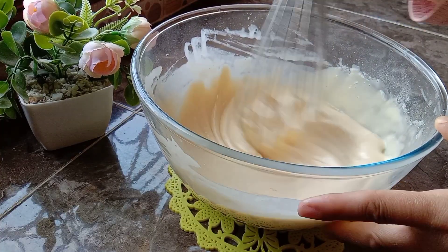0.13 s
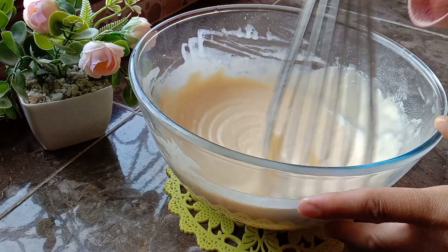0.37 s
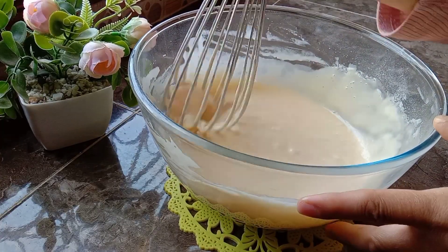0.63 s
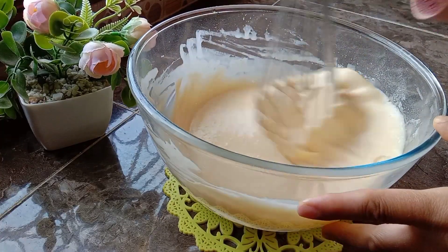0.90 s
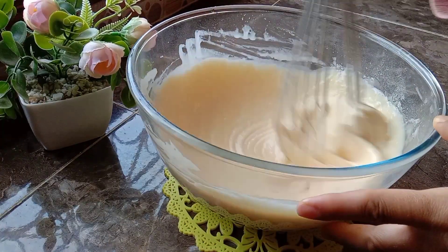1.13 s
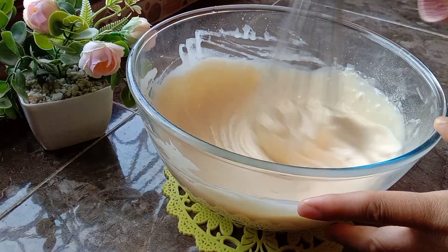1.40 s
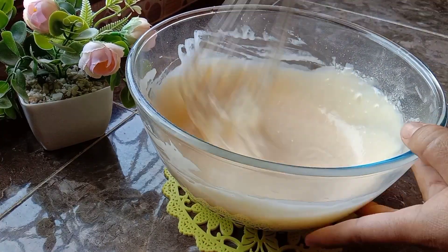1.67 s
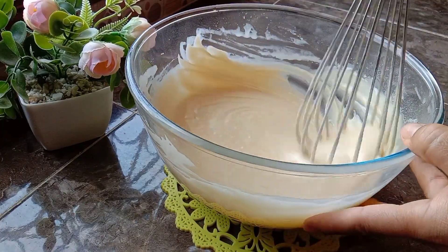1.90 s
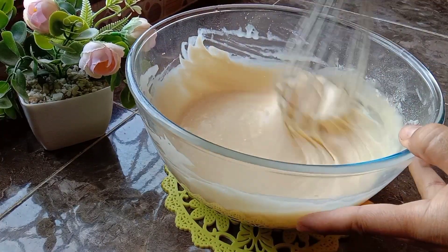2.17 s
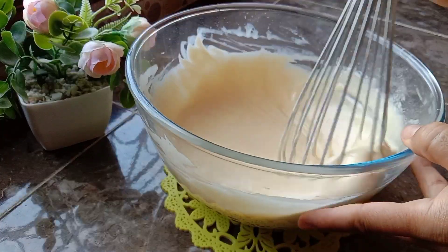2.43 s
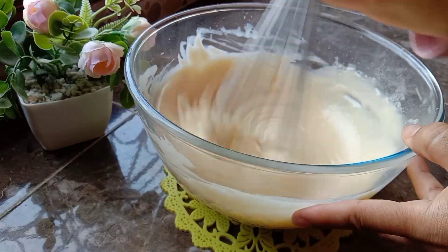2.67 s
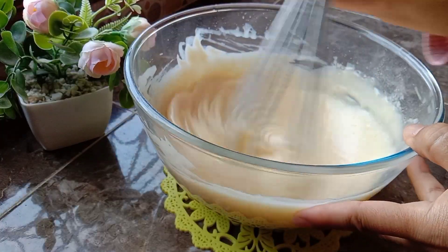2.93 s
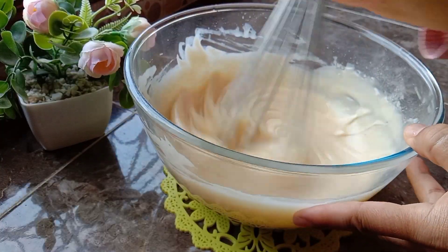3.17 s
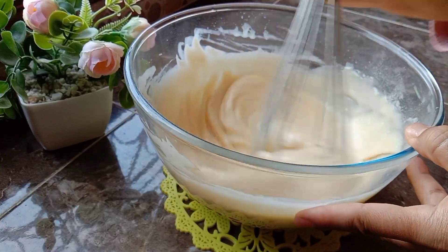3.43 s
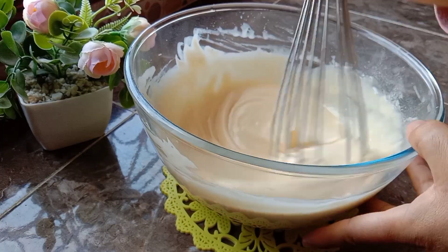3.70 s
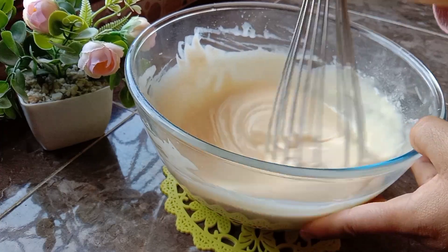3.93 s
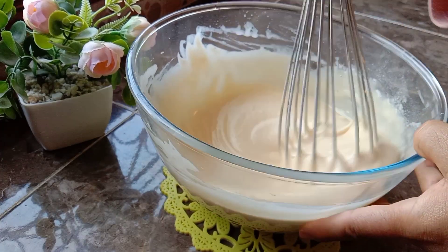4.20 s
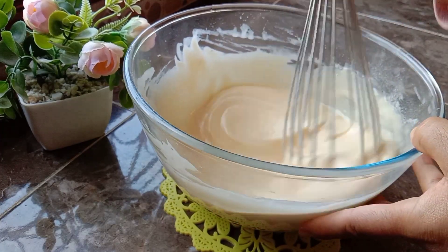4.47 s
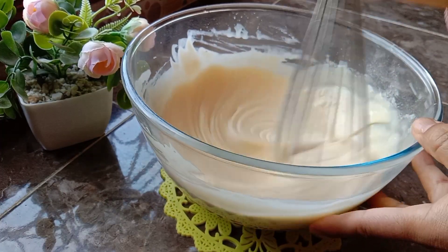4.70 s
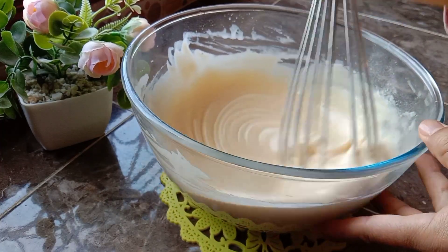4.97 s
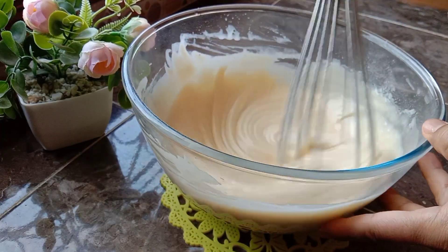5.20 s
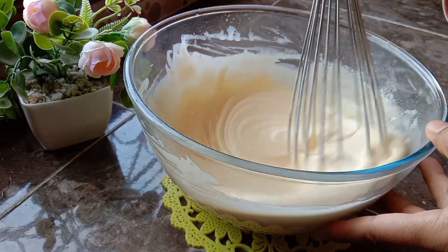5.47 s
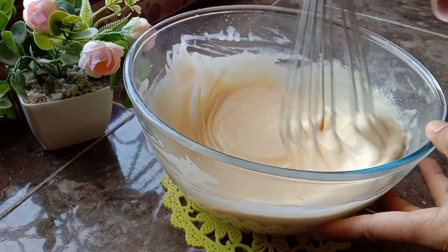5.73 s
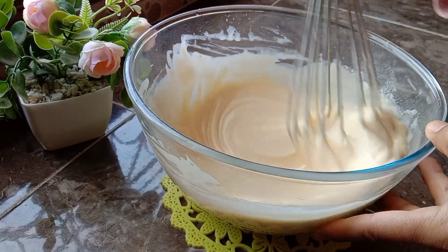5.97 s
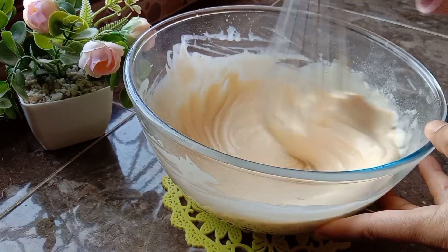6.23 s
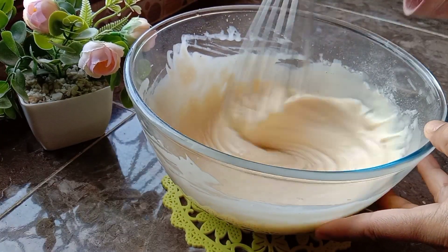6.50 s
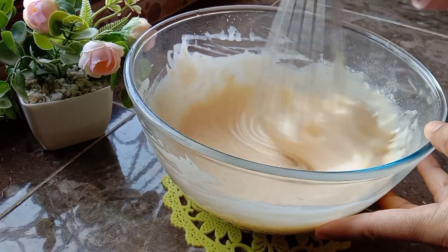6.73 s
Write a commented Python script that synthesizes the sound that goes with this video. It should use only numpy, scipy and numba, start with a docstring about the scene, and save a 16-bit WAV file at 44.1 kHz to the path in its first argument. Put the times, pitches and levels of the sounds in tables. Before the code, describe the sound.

A wire whisk beats thin batter in a glass bowl, heard closely in a hard kitchen. From 0 to 1 seconds the clicks are sparse and moderate, with short scrapes and low murmurs of the bowl on its mat. A strong dull knock lands at 1.2, another at 1.6, then at 1.87 the loudest stroke: a bright double clank with a brief glassy ring and a hissy scrape. From 2 to 3.4 it is softer, with small ticks and gentle drags. From 3.5 strokes come about four per second, each a cluster of damped clatter over a low shudder, heavier around 4.0 to 4.3. Firm knocks hit at 5.34 and 5.75, with a deep counter thump near 5.6. From 6 to 7 the beating is densest and brightest, wires rattling rapidly over rumble. A faint hush and a barely audible thin whine lie beneath.

```python
"""A wire whisk beats thin batter in a glass bowl on a mat, close to a phone in a hard-walled kitchen.
Wire blows are noise bursts through resonances of the batter-damped bottom, or impulses into free rim modes.
Drags scrape: uneven noise through the same bottom. Shoves rumble: noise through mat, bowl and counter resonances.
Blows and rim get a short diffuse tail; a faint hush and whine lie below, turned down by the phone."""
import sys
import numpy as np
from scipy import signal
from scipy.fft import rfft, irfft
from scipy.io import wavfile
from scipy.ndimage import uniform_filter1d
from numba import njit

SR = 44100
rng = np.random.default_rng(int(sys.argv[2]) if len(sys.argv) > 2 else 0)


def int16_out(signal):
    """Quantize to a 16-bit WAV file."""
    q = np.round(np.clip(np.atleast_2d(signal).T, -1, 1) * 32767)
    wavfile.write(sys.argv[1], SR, q.astype(np.int16))


def volts(x):
    """Linear amplitude factor 10**(x/20) for a level x in dB, scalar or array-like."""
    e = np.asarray(x, float) / 20
    return 10 ** e


N = 302967
T = np.arange(N) / SR
STEP_T = T[::44]  # about 1 ms apart


def unit(x):
    """Scale to rms 1."""
    return x / np.sqrt(np.mean(x ** 2))


def ring(x, hz, t60_s):
    """One decaying mode; an impulse of 1 starts it at amplitude 1."""
    pole = np.exp(2j * np.pi * hz / SR - np.log(1000) / (t60_s * SR))
    return signal.lfilter([1], [1, -pole], x).imag


def resonate(x, modes):
    """Sum of resonances given as (pitch_hz, width_hz, level_db)."""
    out = 0 * x
    for hz, width_hz, level_db in modes:
        b, a = signal.iirpeak(hz, hz / width_hz, fs=SR)
        out = out + volts(level_db) * signal.lfilter(b, a, x)
    return out


def band(x, lo_hz, hi_hz):
    """Gentle band-pass."""
    sos = signal.butter(2, [lo_hz, min(hi_hz, .45 * SR)], "band", fs=SR, output="sos")
    return signal.sosfilt(sos, x)


def walk(rate_hz):
    """Random levels of rms 1, held 1 / rate_hz and slewed twice."""
    k = int(SR / rate_hz)
    held = np.repeat(rng.standard_normal(N // k + 1), k)
    return unit(uniform_filter1d(uniform_filter1d(held, k), k)[:N])


@njit
def glide(x, hz, width_hz):
    """Band-pass whose centre moves: a state-variable filter retuned every sample."""
    y, band_state, low_state = np.empty(len(x)), 0., 0.
    for i in range(len(x)):
        g, k = np.tan(np.pi * hz[i] / SR), width_hz / hz[i]
        v = (band_state + g * (x[i] - low_state)) / (1 + g * (g + k))
        band_state = 2 * v - band_state
        low_state += 2 * g * v
        y[i] = k * v
    return y


# background noise spectrum: pitch_hz, relative_level_db
HUSH_SPECTRUM = [(24, -28), (40, -8), (237, 15.5), (715, -4), (1480, -4.5), (1630, -4), (1810, -23),
                 (2570, -3.5), (2840, -6), (16000, -32)]


def hush():
    """Steady background noise of the kitchen: white noise shaped by a spectrum over log frequency."""
    hz, db = np.transpose(HUSH_SPECTRUM)
    log_hz = np.log(np.fft.rfftfreq(N, 1 / SR) + 1)
    colour = volts(np.interp(log_hz, np.log(hz), db))
    return volts(-61.5) * unit(irfft(rfft(rng.standard_normal(N)) * colour, N))


def whine():
    """A faint thin wavering background tone: noise through one narrow resonance."""
    tone = unit(resonate(rng.standard_normal(N), [(5462, 30, 0)]))
    return volts(-85 + 1.5 * walk(6)) * tone


# glass bottom damped by batter: pitch_hz, width_hz, level_db
BOTTOM_MODES = [(1262.6, 82, -1), (1696, 94, -19.5), (2600, 55, -35.5), (3089, 220, 1.5), (3570, 43, -4.5),
                (3980, 200, -58.5), (5026, 770, -25.5), (5770, 89, -3), (6700, 230, 1), (7126, 94, -3.5),
                (8450, 140, -9.5), (9250, 140, -7), (11300, 760, -31.5), (15650, 3100, -15)]
# edges of the low, middle and high range: edge_hz
RANGE_EDGES_HZ = (0, 2100, 5100, SR / 2)


def bottom_modes(k):
    """The bottom's resonances in the low (0), middle (1) or high (2) range."""
    return [m for m in BOTTOM_MODES if RANGE_EDGES_HZ[k] <= m[0] < RANGE_EDGES_HZ[k + 1]]


def efforts(start_s, swell_s, db, fade_db_s):
    """Power of each effort, one row each: it swells to its strength, then fades steadily in dB."""
    since_s = STEP_T - start_s[:, None]
    swell = np.clip(since_s / swell_s[:, None], 0, 1) ** 0.8
    fade_db = fade_db_s * np.clip(since_s - swell_s[:, None], 0, None)
    return (swell * volts(db[:, None] - fade_db)) ** 2


def total_db(power, idle_db):
    """Level of all efforts together over the idle level, per sample."""
    return np.interp(T, STEP_T, 10 * np.log10(power.sum(axis=0) + volts(2 * idle_db)))


def scrape(db, treble_db):
    """Wires drag over the glass in tiny uneven slips that excite the damped bottom."""
    slips = rng.standard_normal(N) * volts(3 * walk(500) + walk(45))
    body = volts(-15.5) * unit(resonate(slips, bottom_modes(0) + bottom_modes(1)))
    body += volts(-2.5) * unit(band(slips, 810, 3900))
    top = volts(-4.5) * unit(resonate(slips, bottom_modes(2)))
    top += volts(-21.5) * unit(band(slips, 4600, 12000))
    return volts(db) * (body + volts(treble_db) * top)


# drags of the wires over the glass: start_s, swell_s, strength_db, treble_relative_db
DRAG_EVENTS = [(-.03, 0.026, -59.5, -7.5), (.066, .02, -51.5, -28.5), (.09, 0.088, -56.5, -14),
               (.364, .02, -54, -22), (.6, 0.12, -64, -10), (.86, .1, -57, -17), (1.15, 0.11, -51, -19),
               (1.375, 0.051, -57.5, -20), (1.6, 0.13, -60, -9.5), (1.87, 0.084, -41.5, -3),
               (2.05, 0.066, -54, -19.5), (2.46, 0.0324, -53.5, -11), (2.53, 0.11, -64.5, -20),
               (2.62, 0.091, -62.5, -18), (2.791, .09, -59, -15.5), (3.04, .1, -59.5, -12),
               (3.28, 0.021, -56, -14), (3.32, 0.055, -56, -19), (3.525, 0.014, -49, -5),
               (3.54, 0.055, -51, -16), (3.76, .02, -48, -8), (3.85, 0.14, -63, -18), (4.02, .02, -58, -10),
               (4.228, 0.042, -49, -7), (4.5, 0.025, -59, -1.5), (4.55, 0.049, -56.5, -25),
               (4.71, .13, -53.5, -10), (5.001, 0.087, -57.5, -10), (5.285, .02, -52.5, -23),
               (5.33, 0.014, -51, -14), (5.49, .03, -56, -16), (5.53, 0.052, -58, -8),
               (5.741, 0.076, -50, -0.5), (5.99, .03, -54, -7), (6.05, 0.012, -49.5, -2),
               (6.09, 0.014, -56, -13), (6.22, .025, -56.5, 1), (6.28, 0.043, -47.5, 0.5),
               (6.45, 0.039, -49.5, -5), (6.5, 0.064, -50, -5), (6.66, 0.044, -53.5, -15),
               (6.8, .07, -59, -16)]


def drags():
    """Scrape of the dragged wires, each drag with its own brightness, treble fading faster."""
    start_s, swell_s, db, treble_db = np.transpose(DRAG_EVENTS)
    # the whisk never quite rests: idle levels
    level_db = total_db(efforts(start_s, swell_s, db, fade_db_s=148.5), idle_db=-77.5)
    top_db = total_db(efforts(start_s, swell_s, db + treble_db, fade_db_s=191), idle_db=-90)
    return scrape(level_db, top_db - level_db)


# bowl on its mat: pitch_hz, width_hz, level_db
MAT_MODES = [(158, 60.5, 2), (207, 43, 2.5), (245, 51, -5), (325.7, 69, -4.5)]
# lowest modes of the bottom: pitch_hz, width_hz, level_db
HUM_MODES = [(584.2, 49, 22.5), (500, 51, 13), (780, 83, -33.5)]
# counter under the mat: pitch_hz, width_hz, level_db
COUNTER_MODES = [(88, 22, 1), (106, 31, 12.5)]


def rumble(db, hz, hum_db, thump_db):
    """The pushed bowl shudders on its mat at a moving pitch, its bottom hums and the counter thumps."""
    push = rng.standard_normal(N) * volts(0.78 * walk(30))
    moving = unit(glide(glide(push, hz, 70.), hz, 70.))
    fixed = unit(resonate(resonate(push, MAT_MODES), MAT_MODES))
    shudder = unit(moving + volts(-1) * fixed)
    hum = unit(band(resonate(push * volts(3.2 * walk(60)), HUM_MODES), 460, 900))
    thump = unit(resonate(resonate(push, COUNTER_MODES), COUNTER_MODES))
    return volts(db) * shudder + volts(hum_db) * hum + volts(thump_db) * thump


# the whisk shoves the bowl: start_s, swell_s, strength_db, shudder_pitch_hz, hum_relative_db
SHOVE_EVENTS = [(-.03, .03, -61.5, 245, 7), (.064, .025, -45, 195, -3.5), (.09, 0.086, -43.5, 207, -7),
                (.36, .025, -51, 185, -1.5), (.89, .08, -58, 192, 5.5), (1.12, .09, -50.5, 260, 4.5),
                (1.21, 0.038, -43.5, 235, -10), (1.375, .04, -52, 262, 0.5), (1.595, 0.023, -46, 215, -11),
                (1.69, 0.02, -55.5, 237, 7.5), (1.865, .02, -48, 190, 3), (1.9, .12, -56.5, 230, 2),
                (2.1, 0.018, -52.5, 272, -2.5), (2.46, .04, -46, 205, -5.5), (2.8, .083, -46.5, 268, -9),
                (3.038, 0.018, -48, 255, -9.5), (3.115, 0.021, -47, 290, -6.5),
                (3.265, 0.093, -43, 248, -6), (3.51, 0.075, -40, 240, -6.5), (3.76, .04, -38, 235, -2.5),
                (4.005, .018, -34.5, 220, -10.5), (4.225, 0.031, -38, 244, -9.5),
                (4.27, 0.081, -39.5, 150, -15.5), (4.5, 0.044, -48, 237, -3.5),
                (4.55, 0.044, -52.5, 198, -4.5), (4.72, .11, -40, 244, -5), (4.84, 0.032, -44.5, 251, -18),
                (4.99, 0.087, -49, 250, -6.5), (5.285, .025, -40.5, 255, -12), (5.32, 0.042, -44, 225, -8),
                (5.49, 0.031, -45, 228, 1), (5.59, .025, -38, 140, -16), (5.742, 0.017, -45, 250, -2),
                (5.77, .045, -40, 238, -10.5), (5.98, .06, -40, 240, -6), (6.225, 0.074, -36, 255, -9.5),
                (6.45, 0.086, -37, 235, -5), (6.69, 0.019, -35.5, 236, -8.5), (6.775, 0.015, -43, 229, 3)]
# the bowl rocks and lands on the counter: start_s, swell_s, strength_db
ROCK_EVENTS = [(.05, 0.075, -64), (1.7, 0.022, -61.5), (3.63, 0.046, -58.5), (4.008, .015, -52),
               (4.06, 0.09, -54), (4.29, .04, -46), (4.4, 0.044, -54.5), (4.52, .02, -54),
               (5.38, 0.018, -42.5), (5.592, 0.021, -35), (6.27, .03, -57), (6.5, .055, -50)]


def shoves():
    """Rumble of the shoved, rocking bowl; pitch is the power-weighted mean, so the strongest shove leads."""
    start_s, swell_s, db, hz, hum_db = np.transpose(SHOVE_EVENTS)
    idle_db, counter_share_db = -83.5, -19  # share: part of every shove that reaches the counter
    power = efforts(start_s, swell_s, db, fade_db_s=145) + 1e-30
    pitch_hz = np.interp(T, STEP_T, hz @ power / power.sum(axis=0))
    hum = efforts(start_s, swell_s, db + hum_db, fade_db_s=140)
    rocks = efforts(*np.transpose(ROCK_EVENTS), fade_db_s=220)
    counter = np.vstack([power * volts(2 * counter_share_db), rocks])
    thump_db = total_db(counter, idle_db + counter_share_db)
    return rumble(total_db(power, idle_db), pitch_hz, total_db(hum, -68.5), thump_db)


def chatter(start_s, db, decay_ms):
    """Force envelope: each blow rises fast and dies away as neighbouring wires follow."""
    t = T[:2048]
    shape = (1 - np.exp(-t / 0.00052)) * np.exp(-1000 * t / decay_ms)
    hits = np.bincount((start_s * SR).astype(int), volts(db), N)
    return signal.fftconvolve(hits, shape)[:N]


# wire blows: start_s, strength_db, knock_relative_db, clack_relative_db, sparkle_relative_db
BLOW_EVENTS = [(0.0648, -31.5, -6.5, -7.5, -5.5), (0.1199, -36, -10, -19, -10),
               (0.3642, -37.5, -8, -4.5, 0), (0.596, -55, -32, -2, -2), (0.683, -42, -12, -16, -34),
               (0.9098, -55.5, 3, -39, -32), (0.9538, -40, -12, -9, -15), (1.0089, -53.5, 5, -34, -30),
               (1.1494, -45, -10.5, -11.5, -15), (1.2006, -20, -6.5, -14.5, -37),
               (1.2435, -32, -24, -9.5, -44), (1.3821, -42.5, -4, -41, -36), (1.4076, -35, -8, -8.5, -39.5),
               (1.5019, -59, -19, 5, -9), (1.6063, -27, -16, -15.5, -21), (1.6311, -45, -5, -6.5, -29),
               (1.6996, -32.5, -21.5, -7.5, -18), (1.7281, -36, -13, -3, -20),
               (1.8711, -19, -15, -42, -1.5), (1.8775, -12, -8.5, -8, -12), (2.111, -44, -18, -5.5, -38),
               (2.232, -63, -18, 3, -19), (2.314, -59, -31, -31, 2), (2.4679, -38, -19.5, -11, -8.5),
               (2.4749, -46.5, -5.5, 0.5, -30), (2.7062, -45, -4, -18, -39), (2.828, -63, -9, -2, -36),
               (2.8436, -39.5, -10, -15.5, -39), (2.877, -39.5, -2.5, -7.5, -33),
               (3.05, -36.5, -4, -7.5, -41), (3.1373, -40.5, -10, -6.5, -13), (3.264, -65.5, 4, -13, -6),
               (3.2817, -32, -17, -3.5, -38), (3.3319, -42.5, -0.5, -4.5, -12),
               (3.355, -39, -14, -4.5, -0.5), (3.3865, -48, -4, -9, -27), (3.4415, -50.5, -13, -5, -21),
               (3.5282, -27.5, -12, -14.5, -32), (3.5721, -38, -16, -7.5, -3), (3.5962, -35.5, -15, -13, 0),
               (3.7597, -26.5, -5.5, -10, -37), (3.7654, -25, -13.5, -19, -8.5), (3.778, -32, -19, -9, -13),
               (3.786, -32, -22, -13, -13), (3.8231, -38.5, -5, 1, -0.5), (3.8752, -51.5, -5, -0.5, -30),
               (3.9863, -40, -16, -25, -33), (3.9977, -46.5, -2, -23, -34),
               (4.0115, -26.5, -11.5, -12, -14), (4.0198, -30.5, -9, -6, -16),
               (4.058, -40.5, -25, -11.5, -5.5), (4.0784, -42.5, -10, -14, -19), (4.2276, -51, 8, 1, -9),
               (4.2545, -24, -14, -6, -8.5), (4.301, -42, -21, -2, -0.5), (4.496, -68.5, 18.5, -2, -6),
               (4.5239, -28, -13, -4, -8), (4.5338, -33, -32, -7, -11), (4.735, -44, -40, -9, -31.5),
               (4.7511, -41.5, -8.5, -12.5, -43), (4.793, -42, -5.5, -5, -28), (4.821, -34, -14, -7, -4),
               (4.8332, -36, -10.5, -7, -12), (4.8694, -37, -7.5, -9.5, -41), (5, -35.5, -12, -10.5, -40),
               (5.0311, -38.5, -8, -19, -40), (5.095, -46.5, -5, -3, -27), (5.2496, -38, -12, -7, -45.5),
               (5.2876, -40.5, -5.5, -10.5, -3.5), (5.3389, -21, -24, -11.5, -16),
               (5.355, -29, -17, -9.5, -10), (5.3626, -28, -11, -8.5, -17), (5.499, -35.5, -8, -8.5, -47),
               (5.5029, -53, -6, -14, -33), (5.5113, -30.5, -8.5, -15, -11.5), (5.5356, -39, -10, -4, -10),
               (5.603, -32.5, -13.5, -4, -17), (5.6184, -47.5, -32, -3, -9),
               (5.7505, -17.5, -11.5, -15, -13), (5.7559, -27, -21, -10, -38), (5.988, -32, -8.5, -15, -48),
               (6.0069, -21.5, -20, -17.5, -18.5), (6.0269, -30.5, -12, -8.5, -10),
               (6.0534, -28, -20, -13.5, -8), (6.0915, -38.5, -4, -1.5, -20), (6.2288, -34, -6, -10.5, -38),
               (6.2332, -26.5, -18, -18, -42), (6.2687, -31.5, -12, -7, -17),
               (6.2966, -23.5, -23, -11.5, -13), (6.3039, -29, -20, -1.5, -1.5),
               (6.3208, -34.5, -8.5, -4, 1.5), (6.3479, -43, -5, 1, -27), (6.464, -34, -9, -11, -46),
               (6.4717, -25.5, -14, -13.5, -18), (6.5001, -29.5, -10, -9.5, -10),
               (6.536, -30, -14, -5.5, -8.5), (6.5552, -22, -9, -6.5, -5.5), (6.5841, -41, -22, 3, -36),
               (6.6978, -22.5, -7, -10.5, -18), (6.7105, -30, -12, -8.5, -7.5),
               (6.7818, -23, -7.5, -24, -9), (6.7878, -26, -6, -5.5, -13)]
# ringing of the wires themselves: pitch_hz
WIRE_MODES_HZ = (6950, 7090, 7180)


def blows():
    """Bursts of wire contacts excite the damped bottom, range by range; the wires ring on a little."""
    start_s, db, knock_db, clack_db, sparkle_db = np.transpose(BLOW_EVENTS)
    wires = rng.standard_normal(N) * volts(2.5 * walk(700))
    knock = wires * chatter(start_s, db + knock_db, decay_ms=4.45)
    clack = wires * chatter(start_s, db + clack_db, decay_ms=3.17)
    sparkle = wires * chatter(start_s, db + sparkle_db, decay_ms=2.53)
    bottom = volts(22.5) * resonate(knock, bottom_modes(0)) + volts(8.5) * band(knock, 800, 2710)
    bottom += volts(18.5) * resonate(clack, bottom_modes(1)) + volts(5) * band(clack, 2100, 5330)
    bottom += volts(14.5) * resonate(sparkle, bottom_modes(2)) + volts(-2) * band(sparkle, 4000, 11000)
    wire_ring = sum(ring(sparkle, hz, t60_s=.25) for hz in WIRE_MODES_HZ)
    return bottom + volts(-45 + 4.5 * walk(250)) * wire_ring


# reverberation by band: centre_hz, t60_s
ROOM_DECAY = [(250, 1), (1000, 0.76), (3000, 0.21), (7000, 0.34), (13000, 0.17)]


def room(x):
    """Diffuse tail: noise bands that decay, generally faster in the treble."""
    t = T[:SR]
    tail = 0
    for hz, t60_s in ROOM_DECAY:
        noise = unit(band(rng.standard_normal(SR), hz / 2.37, hz * 1.87))
        tail = tail + noise * np.sqrt(hz) * 1000 ** (-t / t60_s)
    tail *= 1 - np.exp(-t / 0.0027)
    return signal.fftconvolve(x, tail / np.linalg.norm(tail))[:N]


# blows on the rim: start_s, strength_db, favoured_mode_hz, fall_db_per_octave away from it
RIM_BLOW_EVENTS = [(0.363, -30, 1620, 6), (.596, -49.5, 3570, 4), (.684, -44, 1620, 4.5),
                   (0.95, -45.5, 2500, 6), (1.872, -21, 1720, 3.5), (1.881, -16.5, 2540, 3),
                   (2.111, -38, 1560, 7), (2.233, -50, 1631, 9), (5.748, -30.5, 6700, 2),
                   (6.229, -35.5, 1650, 1)]
# free rim, some modes in split pairs: pitch_hz, level_db, t60_s
RIM_MODES = [(364, -1, .45), (890, -6, .35), (900, -9, .35), (1610, -6, .45), (1626, 0, .4),
             (2496, -5, .45), (2517, -1, .45), (3570, -8, .3), (4794, -13, .45), (4818, -9, .5),
             (6205, -16, .3), (6655, -11, .4), (6715, -11, .35), (7750, -15, .25), (9440, -16, .2)]


def rim():
    """Blows high on the wall ring the rim; the spot struck favours one mode, batter makes the ring waver."""
    start_s, db, favoured_hz, fall_db = np.transpose(RIM_BLOW_EVENTS)
    out = 0
    for hz, mode_db, t60_s in RIM_MODES:
        octaves = abs(np.log2(hz / favoured_hz))
        kicks = np.bincount((start_s * SR).astype(int), volts(db + mode_db - fall_db * octaves), N)
        out = out + ring(kicks, hz, t60_s) * volts(2.8 * walk(35))
    return volts(-16) * out


def scene():
    """Blows and rim with their room tail, plus scrape, rumble, hush and whine."""
    background = hush() + whine()
    stirring = drags() + shoves()
    hits = blows() + rim()
    return (hits + volts(-12) * room(hits) + stirring + background)[None]


def suppress(x, over_db, depth_db):
    """Noise suppressor: cells near the quiet level of their frequency are turned down."""
    size = 1024
    cells = signal.stft(x, nperseg=size)[2]
    power = uniform_filter1d(abs(cells) ** 2, size=9, axis=-2)  # across frequency
    power = uniform_filter1d(power, size=3, axis=-1) + 1e-20  # across time
    quiet = np.percentile(power, 10, axis=-1, keepdims=True) * volts(2 * over_db)
    gain = np.clip(1 - quiet / power, volts(-depth_db), 1)
    return signal.istft(cells * gain, nperseg=size)[1][..., :N]


def band_limit(x):
    """A steep low-pass at the top of the band."""
    return signal.sosfilt(signal.butter(12, 16810, fs=SR, output="sos"), x)


def record(dry):
    """The phone trims deepest bass and top treble, suppresses the hush and rounds the loudest peaks."""
    bass_cut = signal.butter(3, 50, "high", fs=SR, output="sos")
    treble_cut = signal.butter(8, 15700, fs=SR, output="sos")
    trimmed = signal.sosfilt(np.vstack([bass_cut, treble_cut]), dry)
    clean = suppress(trimmed, over_db=2.5, depth_db=9)
    return band_limit(0.35 * np.tanh(clean / 0.36))


dry = scene()
out = record(dry)
int16_out(out)
```